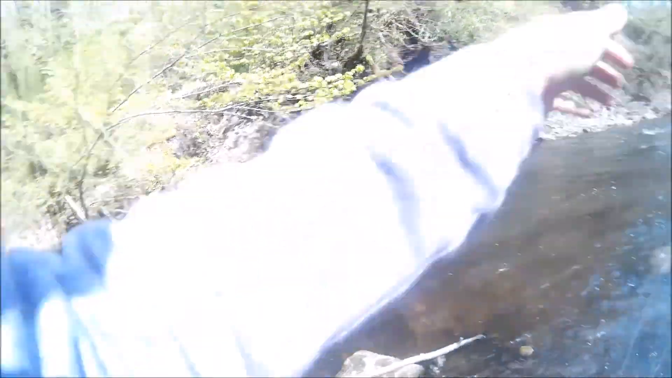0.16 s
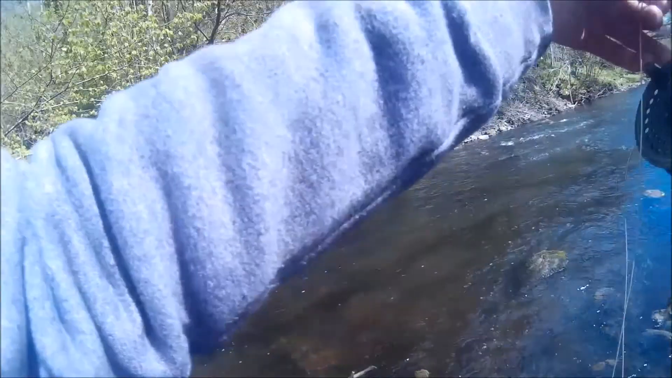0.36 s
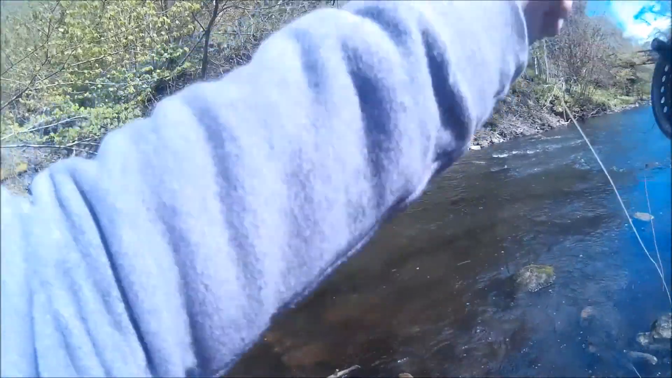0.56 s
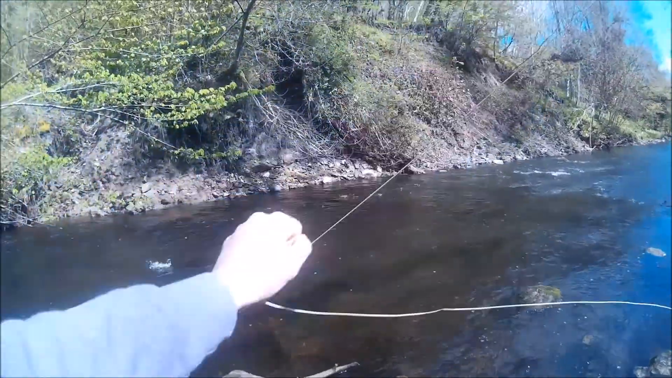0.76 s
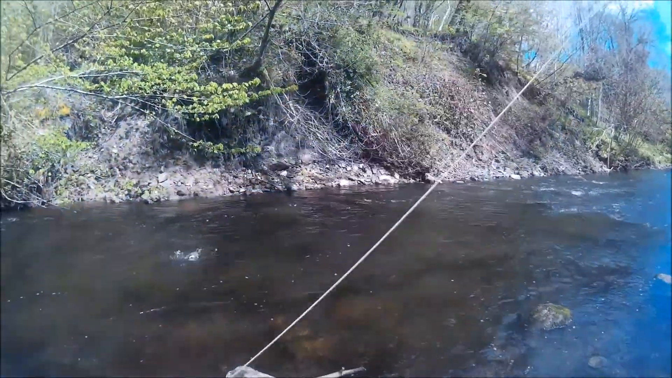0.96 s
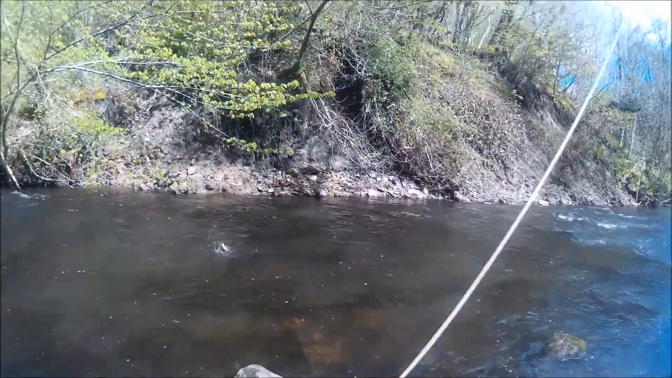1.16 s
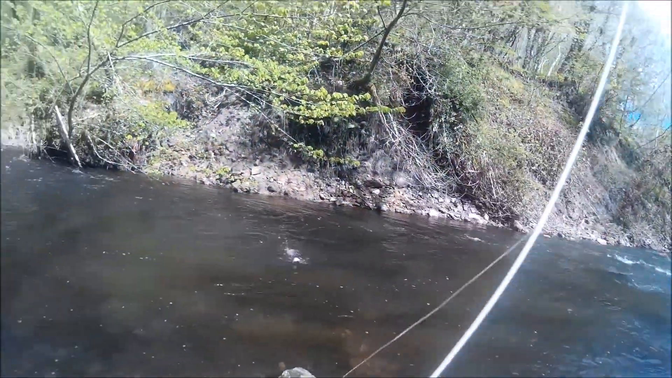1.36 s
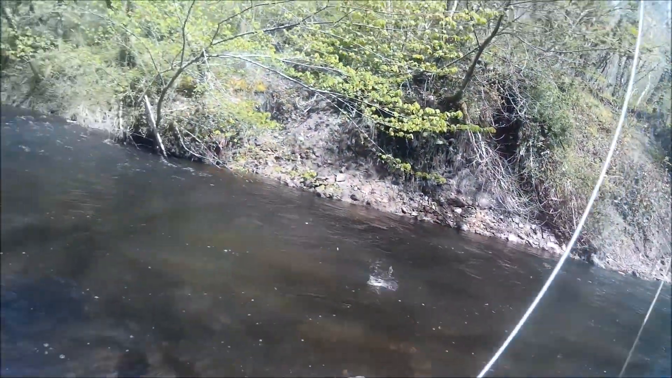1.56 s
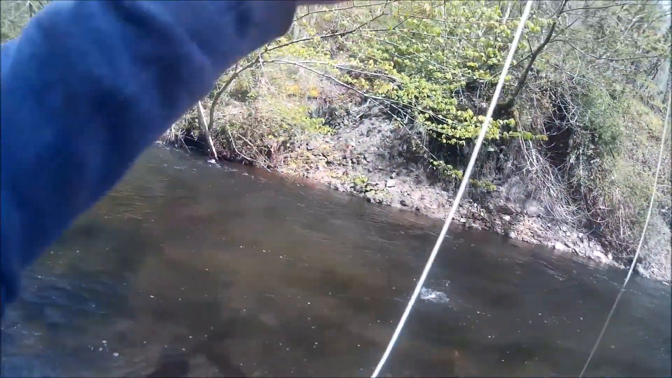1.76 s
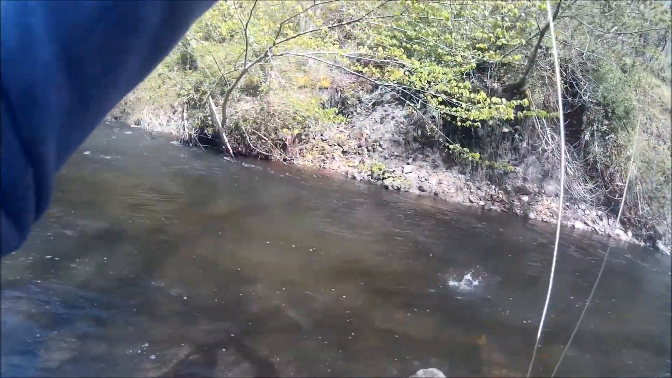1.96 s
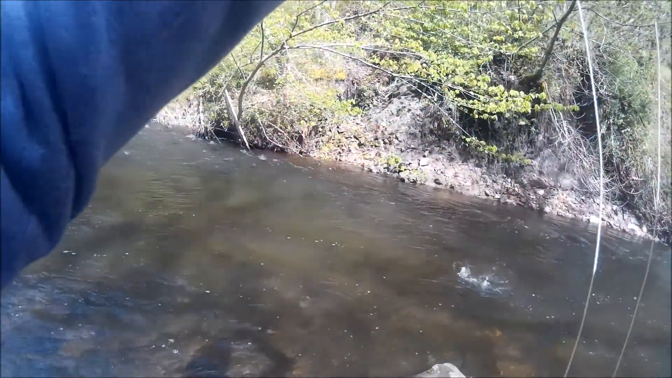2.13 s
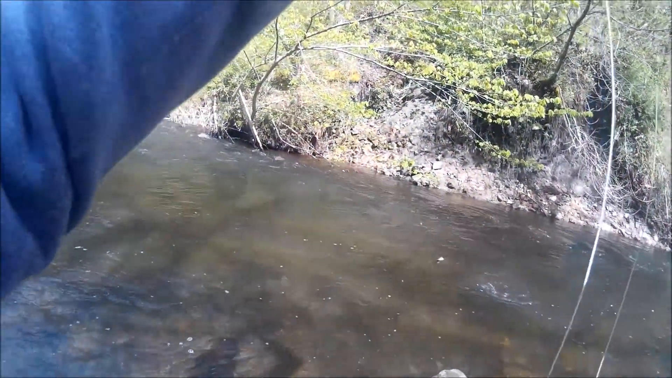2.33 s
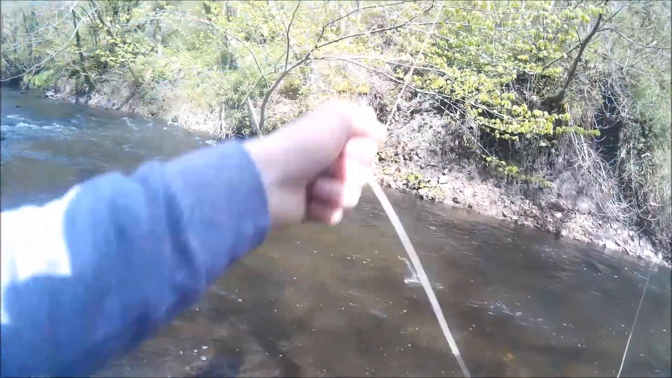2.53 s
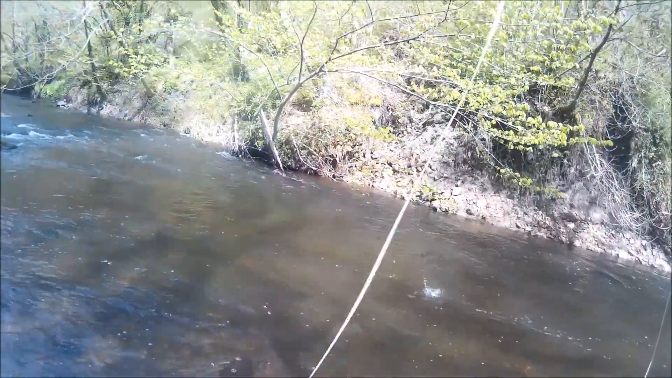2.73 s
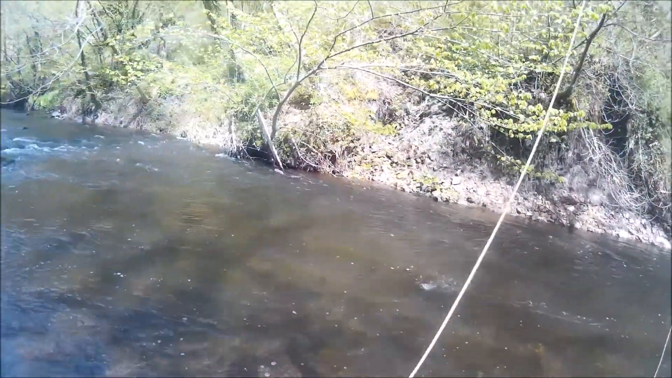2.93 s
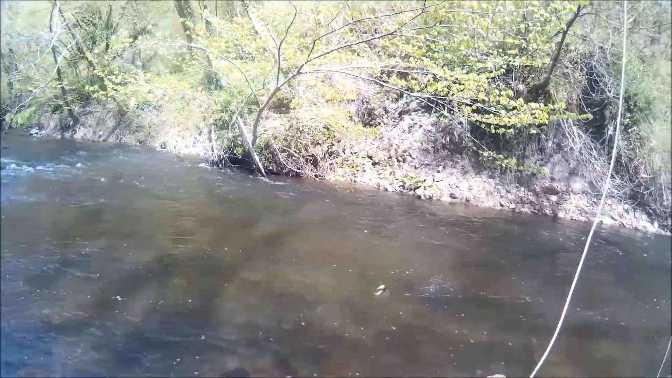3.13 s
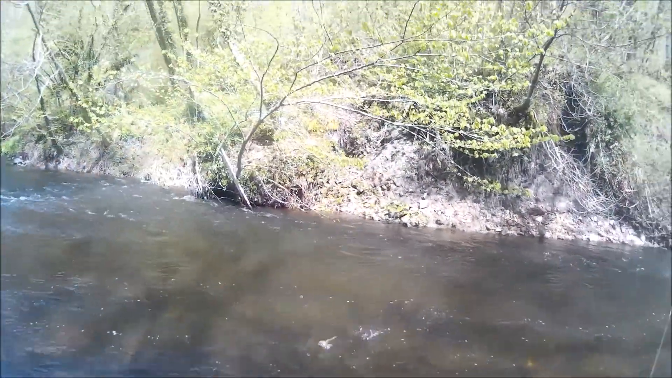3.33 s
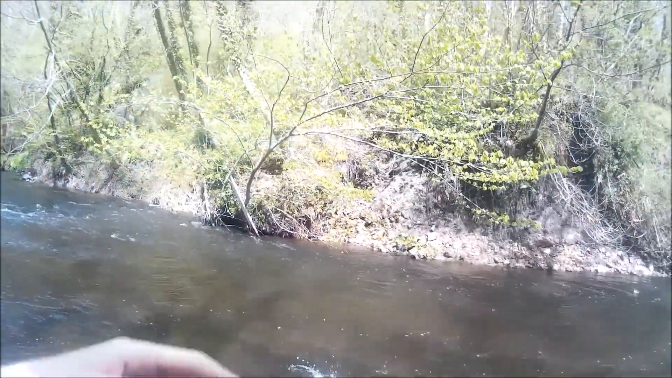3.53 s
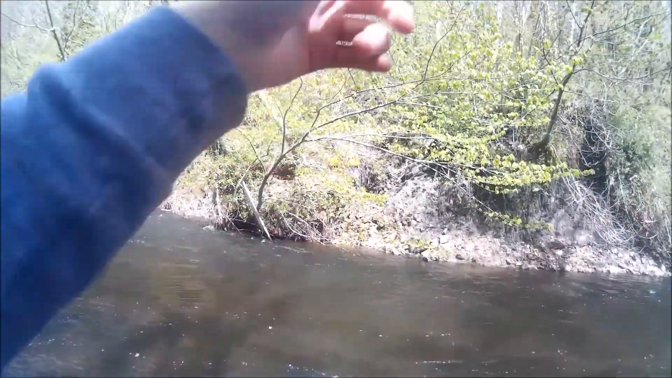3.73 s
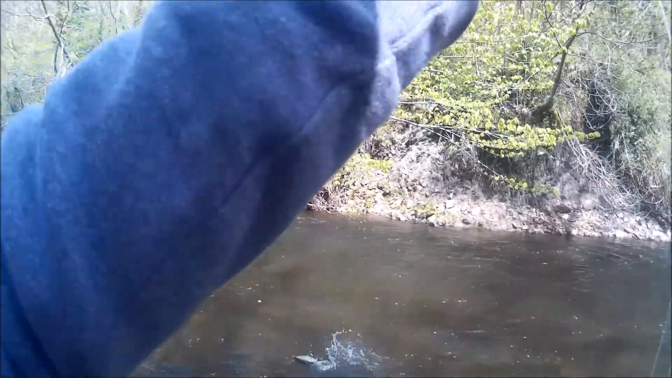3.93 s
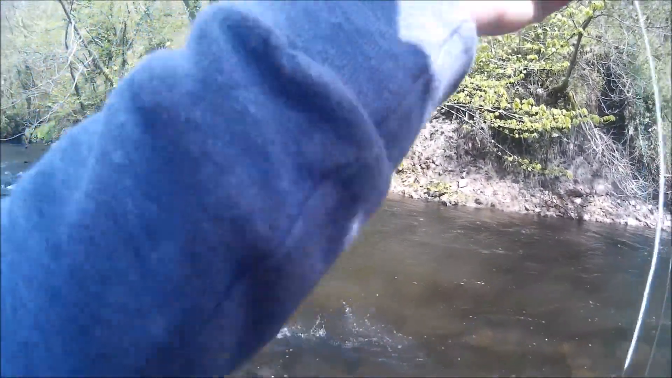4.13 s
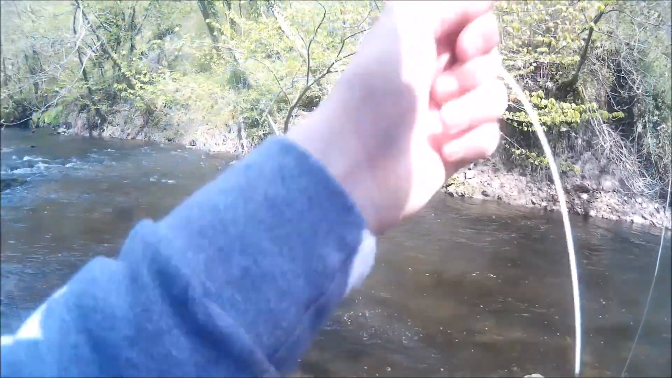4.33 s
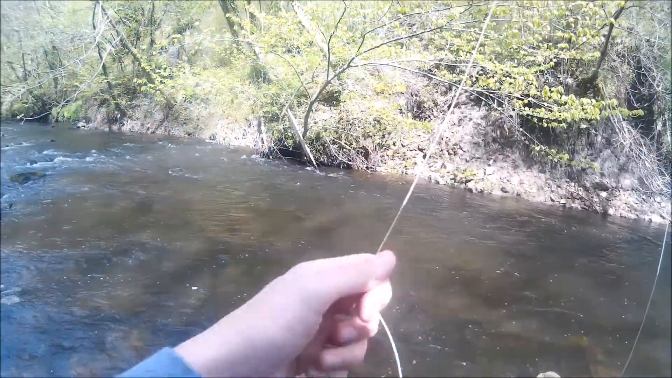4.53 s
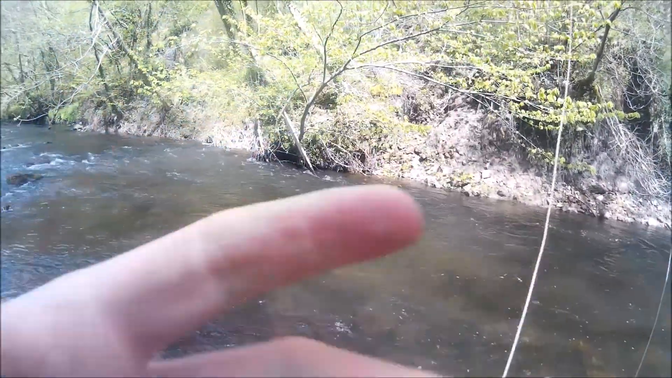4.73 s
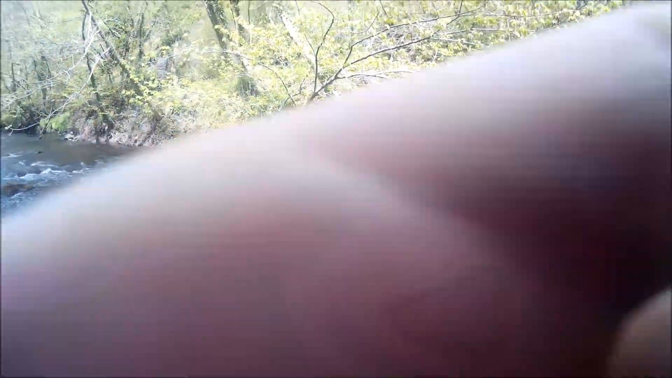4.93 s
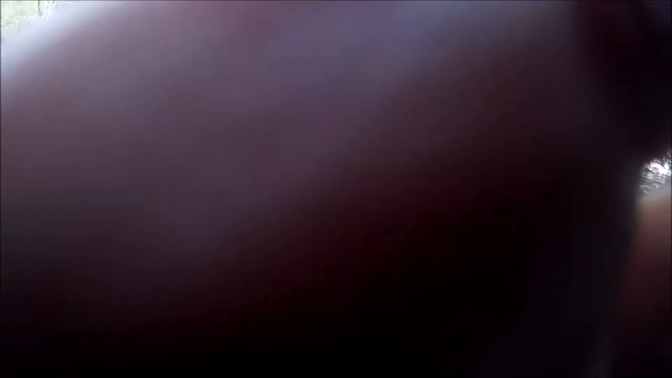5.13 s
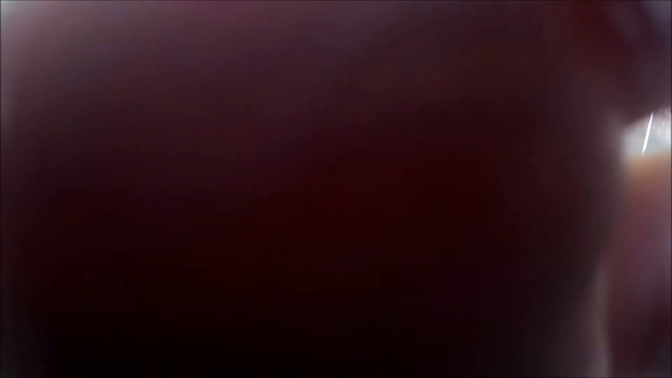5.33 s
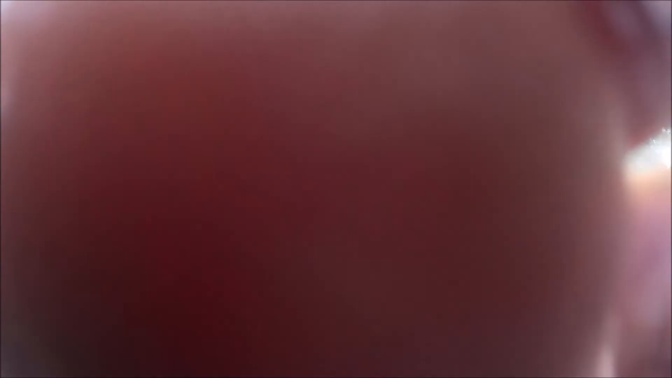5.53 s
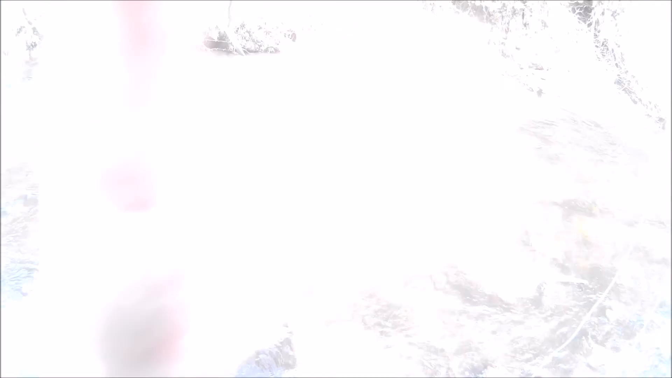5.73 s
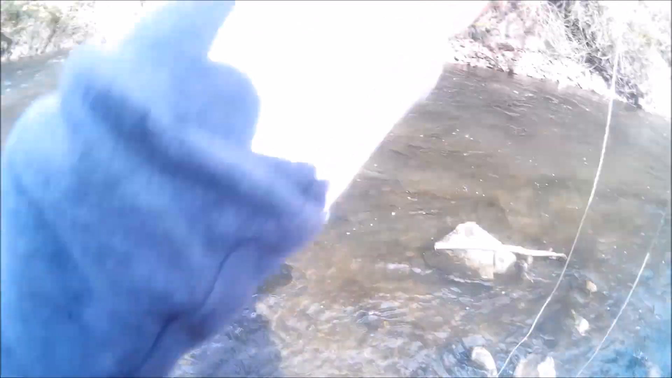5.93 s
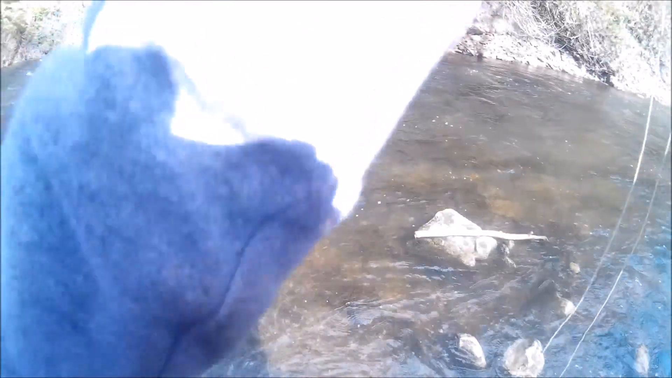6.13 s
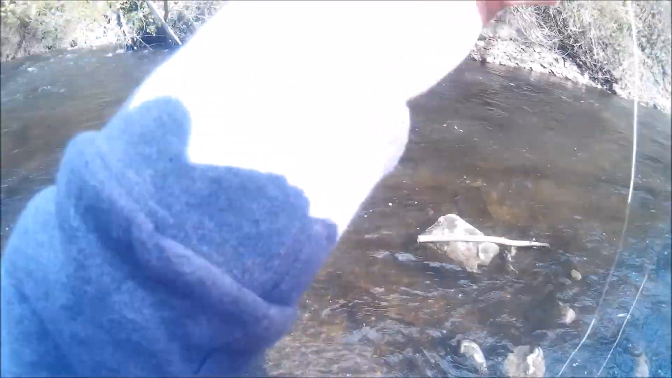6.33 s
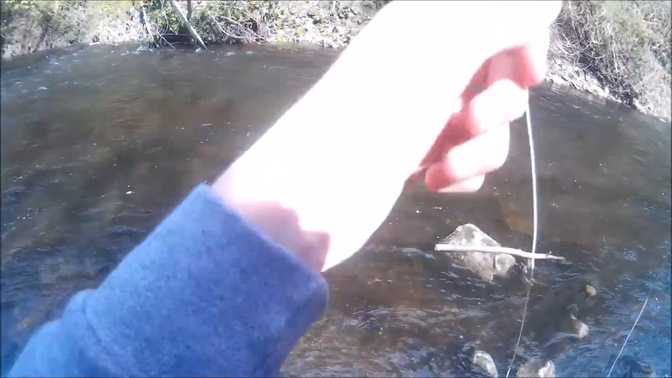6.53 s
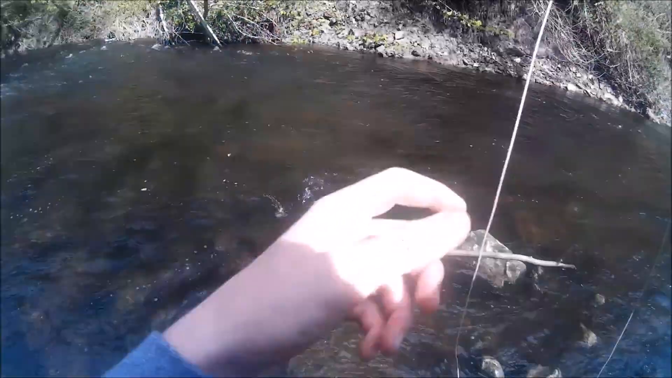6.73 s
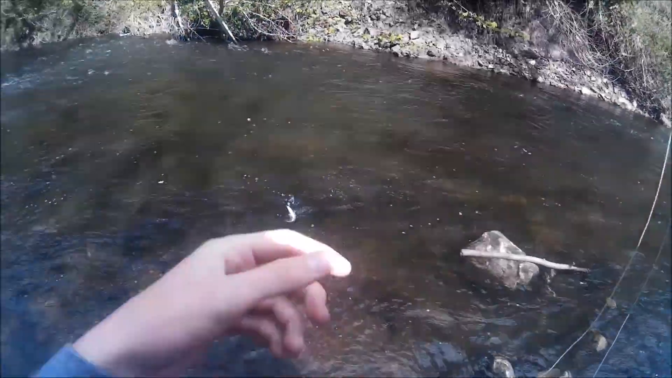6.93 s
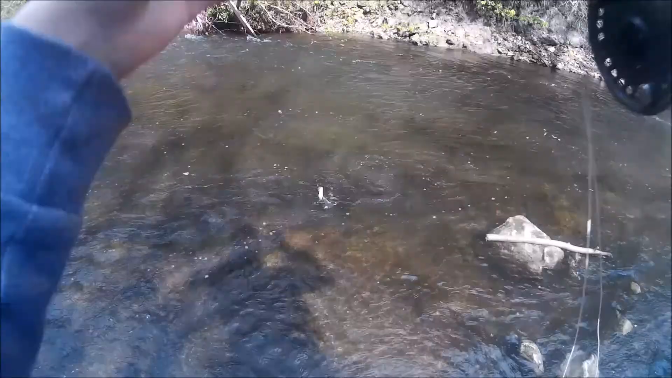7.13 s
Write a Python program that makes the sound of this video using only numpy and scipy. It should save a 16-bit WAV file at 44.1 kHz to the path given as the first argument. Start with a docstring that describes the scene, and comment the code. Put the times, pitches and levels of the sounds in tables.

```python
"""Close ticks, knocks and rubbing on the sealed plastic case of a small camera beside a stream.
The mount knocks and makes the case ring; fleece and fingers catch and slip on it and push against it.
About five seconds in, a hand grips it hard enough to overload the input. Underneath lie the
muffled stream, the hiss of the electronics and a thin high whine."""
import sys
import numpy as np
from scipy import signal
from scipy.fft import rfft, irfft, next_fast_len
from scipy.io import wavfile
from scipy.ndimage import uniform_filter1d

SR = 44100
rng = np.random.default_rng(int(sys.argv[2]) if len(sys.argv) > 2 else 0)


def wav_record(signal):
    """Record a signal, one row per channel, as 16-bit PCM in the file named by sys.argv[1]."""
    frames = np.transpose(np.atleast_2d(signal))
    bounded = np.clip(frames, -1, 1)
    # unit amplitude maps onto the largest positive 16-bit level
    quanta = np.round(bounded * 32767).astype(np.int16)
    wavfile.write(sys.argv[1], SR, quanta)


N = 320766
TOP_HZ = 16000

# The low and high tones the case rings at. Each row: pitch in Hz, relative level in dB.
LOW_TONES = [(240, -6.5), (610, -1.5), (810, -3), (1110, -6), (1380, 7), (1640, 6), (1820, 9)]
HIGH_TONES = [(2400, -10.5), (2780, -8), (3050, -7.5), (3650, -6.5), (4150, -5), (4900, -12), (5700, -13),
              (7600, -7.5), (8300, -14), (10200, -14.5), (11200, -20.5), (12500, -23.5), (14600, -24.5)]
# Blows on the case. Each row: start in seconds, snap level in dB, knock level in dB, pitch in Hz that
# the struck spot favours, treble that a soft contact takes from the snap in dB per octave.
BLOWS = [(0.1709, -31, -13.5, 2300, 35), (0.198, -19, -8.5, 1370, 51), (0.25, -23, -27, 2380, 28),
         (0.3202, -48, -23.5, 607, 13.5), (0.3376, -0.5, -18.5, 2960, 11), (0.411, 1, -24, 4460, 1.5),
         (0.4252, -13.5, -31, 4220, -2), (0.559, -46, -61, 2980, 11), (0.649, -65, -22.5, 1246, 6.5),
         (0.719, -45, -27.5, 610, 7), (0.7677, -35.5, -39, 2860, 10.5), (0.9091, -50, -15, 1200, 13),
         (0.9228, -10, -37, 2910, 1), (0.9398, -14.5, -44, 3060, -0.5), (1.5714, -50, -33.5, 1275, 0),
         (1.7654, 4, -27, 3306, 4.5), (1.77, 3.5, -16.5, 3340, -1.5), (1.796, -2, -35, 2980, -3),
         (1.8352, -42, -20.5, 1380, 5.0), (1.8396, -23, -30, 4100, -13), (1.8423, -10.5, -20, 3170, 0.5),
         (1.8658, -26.0, -36, 2970, 6), (1.8798, -31, -36, 3000, 4), (1.899, -28.5, -39, 2940, 4),
         (2.1378, -37.5, -44, 3628, 3), (2.4561, -27, -15.5, 1240, 36.5), (2.4764, -34.5, -33, 2630, 5),
         (2.534, -36, -25.5, 1335, 22), (2.765, -45, -37, 1363, 27), (2.824, -40, -33.5, 1800, 15.5),
         (2.866, -38, -32.5, 1870, 25), (3.206, -28.5, -35.5, 3330, 6), (3.2333, -33, -40, 1880, 11),
         (3.2487, -41.5, -40, 3640, 13.5), (3.262, -44, -45, 1870, 8), (3.295, -43.0, -35, 1510, 20),
         (3.3436, -34, -37, 1920, 11), (3.369, -30.5, -34.5, 2950, 7), (3.3944, -21, -30.5, 3370, -1),
         (3.412, -14.5, -25, 3790, -5.5), (3.702, -52.5, -35.5, 1380, 20),
         (3.7561, -23.5, -29.5, 2240, 6.5), (3.842, -15.5, -16.5, 1630, 18), (3.857, -52, -19, 1380, 8.0),
         (3.8833, -26, -21, 1640, 14), (3.935, -52, -25, 1420, 12.0), (4.324, -58, -31.5, 1390, 8.0),
         (4.3464, -31, -33, 1720, 26), (4.4134, -22, -35, 2490, 13), (4.582, -48, -35.5, 1300, 17),
         (4.6012, -36, -32.5, 1450, 17), (4.665, -37, -25.5, 1510, 18), (4.869, -20, -19, 1816, 8),
         (4.922, -27.5, -27, 1270, 7), (4.937, -24, -25.5, 1370, 9), (4.984, -10, -27, 2890, -0.5),
         (4.9977, -13.5, -22.5, 3040, -1), (5.025, -22, -43, 3630, 0), (5.0461, -9, -13.5, 3830, 5),
         (5.052, -12, -16, 1630, 6), (5.0678, -14, -14.5, 1330, 5.0), (5.0895, -30, -10, 1810, 13),
         (5.099, -15.5, -32, 3200, 8), (5.109, -18, 0.5, 1376, 0), (5.1168, -21, 13.5, 813, 9.0),
         (5.118, 7.5, 10, 1368, -8.5), (5.1605, -27, -12, 610, 10.5), (5.2735, -28.5, -13, 1210, 7.5),
         (5.3162, 12.5, 10, 1420, 16.5), (5.3235, -8, -1, 1570, 11), (5.3724, -34.5, -40, 3130, 6),
         (5.433, -27, -15.5, 1470, 29), (5.453, -38.5, -23.5, 582, 8), (5.9385, 2, -19.5, 2930, -1.5),
         (5.961, -31, -39.5, 2950, 10), (5.969, -32, -43, 2950, 14), (5.9843, -25.0, -32.5, 2910, 1.5),
         (6.051, -53.5, -34, 1370, 14.5), (6.09, -40.5, -49.5, 2760, 17), (6.336, -38.5, -47, 2790, 21)]

def ticks_and_knocks():
    """Each blow rings the high tones as a snap and the low tones as a knock."""
    out = np.zeros(N + SR)
    for start, snap_db, knock_db, spot_hz, dull_db in BLOWS:
        damping = 1.5 if 5.1 < start < 5.35 else 1  # the gripping hand shortens the knocks
        snap = blow(HIGH_TONES, spot_hz, dull_db, rise_s=0.0002, contact_s=0.0015)
        snap = band(snap, 1600, TOP_HZ)
        knock = blow(LOW_TONES, spot_hz, 0, rise_s=0.00036, contact_s=0.0029, damping=damping)
        i = int(start * SR)
        out[i:i + len(snap)] += undb(snap_db) * snap + undb(knock_db) * knock
    return out[:N]


def blow(tones, spot_hz, dull_db, rise_s, contact_s, damping=1):
    """One blow: tones near spot_hz ring louder, and the contact chatters for a moment."""
    hz = np.array(tones)[:, :1]
    chance = rng.standard_normal(420)
    boost_db = 11 * np.exp(-(np.log2(hz / spot_hz) / 0.11) ** 2)
    octaves_above = np.log2(np.maximum(hz / max(spot_hz, hz[0, 0]), 1))
    extra_db = 2 * chance[:len(tones), None] + boost_db - dull_db * octaves_above
    rattle = undb(-26) * np.linspace(1, 0, 400)
    chatter = chance[-400:] * (np.exp(-np.arange(400) / SR / contact_s) + rattle)
    chatter[0] = 11  # the first touch is the strongest
    sound = signal.fftconvolve(ring(tones, extra_db, rise_s, damping), chatter)
    return sound / np.abs(sound).max()


def ring(tones, extra_db, rise_s, damping):
    """The plastic rings after one tap; higher tones die sooner."""
    hz, db = np.array(tones).T[:, :, None]
    t = np.arange(SR // 16) / SR
    ring_s = 34 / (hz + 600) / damping  # time to fade by 60 dB
    sign = (-1) ** np.arange(len(hz))[:, None]  # neighbouring tones swing against each other
    envelope = np.exp(-np.log(1000) * t / ring_s) * (1 - np.exp(-(t / rise_s) ** 2))
    return np.sum(sign * undb(db + extra_db) * envelope * np.sin(2 * np.pi * hz * t), axis=0)


# Dull bumps. Each row: start in seconds, strength in dB, pitch in Hz.
JOLTS = [(0.287, -23, 234), (0.318, -27, 113), (0.721, -28, 125), (1.79, -27, 224), (1.985, -30.5, 117.6),
         (2.826, -28.5, 268), (2.863, -32.5, 224), (3.801, -29.5, 103), (4.915, -19, 95), (5.119, 5, 176.9),
         (5.162, -19, 99.5), (5.3152, -2.5, 120), (5.386, -18.5, 85)]

def bumps():
    """The whole case is jolted and swings once or twice."""
    out = np.zeros(N + SR)
    t = np.arange(SR // 8) / SR
    for (start, db, hz), side in zip(JOLTS, np.sign(rng.standard_normal(len(JOLTS)))):
        envelope = np.exp(-t * hz / 1.1) * (1 - np.exp(-t / 0.000079))
        i = int(start * SR)
        out[i:i + len(t)] += side * undb(db) * envelope * np.sin(2 * np.pi * hz * t)
    return out[:N]


# Strokes of cloth or skin. Each row: start in seconds, length in seconds, fade in dB (negative grows),
# then the levels of the low tones, the high tones and the fine rasp in dB.
RUBS = [(0.18, 0.17, 10.5, -33.5, -48.5, -64.5), (0.21, 0.041, 2, -27.5, -44.5, -63),
        (0.33, 0.14, 2, -51, -56.5, -66), (0.645, 0.23, 3, -46, -57, -70.5),
        (0.911, 0.0073, -4, -37, -50, -80), (0.93, 1, 22, -54.5, -63, -77),
        (1.795, 0.095, 6.5, -36.5, -41.5, -56.5), (1.9, 0.3, 17, -51.5, -64.5, -84),
        (2.42, 0.14, -9, -54, -65, -96), (2.57, 0.38, 9.5, -52, -60.5, -75),
        (3.42, 0.022, 9.5, -40, -41.5, -87), (3.72, 0.074, -12, -56.5, -60, -82.5),
        (3.81, 0.14, 5.5, -38.5, -45.5, -64.5), (3.89, 0.027, 1.5, -36, -39.5, -62),
        (4.3, 0.15, 3, -48.5, -55, -77), (4.57, 0.12, -16, -66.5, -77, -89.5),
        (4.845, 0.023, -8.5, -48.5, -51.5, -64), (4.91, 0.032, -2, -49.5, -46, -57.5),
        (4.98, 0.076, -3.5, -40.5, -39, -49), (5.095, 0.037, 9, -25, -27.5, -46.5),
        (5.16, 0.032, 4.5, -38, -46, -65), (5.245, 0.087, 0.5, -36.5, -44.5, -61.5),
        (5.39, 0.11, -5.5, -53.5, -62, -80), (5.53, 0.046, 2, -48.5, -58.5, -69),
        (5.6, 0.042, 4, -50, -51.5, -63), (5.95, 0.085, 3.5, -42, -52, -67),
        (6.05, 0.54, 2, -64.5, -69.5, -88)]

def rubbing(resting_gain):
    """Slipping fibres ring the case and rasp in the treble; a faint rub goes on between strokes."""
    low_gain, high_gain, rasp_gain = gestures(RUBS, rise_db_per_s=695, fall_db_per_s=697.5)
    low_tones, high_tones = np.array(LOW_TONES[1:]), np.array(HIGH_TONES[:7])
    # Soft cloth favours the low tone at 1380 Hz and the lowest of the high tones.
    octaves = np.log2(low_tones[:, 0] / 1380)
    low_db = np.minimum(3.5 * octaves, -14 * octaves)
    high_db = -9 * np.log2(high_tones[:, 0] / high_tones[0, 0])
    low = drag(fibres(6000, 4, 2.5, 71), low_tones, low_db, rise_s=0.0022, damping=0.62, wander_db=3)
    high = drag(fibres(5000, 3.4, 2.9, 120), high_tones, high_db, rise_s=0.001, damping=1.4, wander_db=2)
    rasp = unit(band(fibres(12000, 1.8, 2, 81), 5200, 11800))
    low_gain = np.hypot(low_gain, resting_gain)
    high_gain = np.hypot(high_gain, resting_gain * undb(-17))
    return low_gain * low + high_gain * high + rasp_gain * rasp


def fibres(slips_per_s, spread_db, patchy_db, patches_per_s):
    """Fibres catch and let go at random: mostly small slips, in louder and softer patches."""
    size_db = np.minimum(spread_db * rng.exponential(size=N), 12)
    slips = (rng.random(N) < slips_per_s / SR) * rng.standard_normal(N)
    return slips * undb(size_db + patchy_db * wander(patches_per_s))


def drag(slips, tones, extra_db, rise_s, damping, wander_db):
    """The contact travels over the case, so each tone swells and fades on its own."""
    out = 0
    for tone, db in zip(tones, extra_db):
        ringing = signal.fftconvolve(slips, ring([tone], db, rise_s, damping))[:N]
        out += undb(wander_db * wander(14)) * ringing
    return unit(out)


# The deep sound of the case bending. Each row: pitch in Hz, relative level in dB.
FLEX_COLOUR = [(29, -33.5), (50, -3), (187, -5), (270, -10), (350, -14.5), (500, -17), (650, -51),
               (1100, -120)]
# Pushes of a hand or arm. Each row: start in seconds, length in seconds, fade in dB,
# level of the case flexing in dB, level of the air swaying in dB.
HAND_PUSHES = [(0.18, 0.091, -6, -38.5, -54), (0.7, 0.24, 3, -48, -70.5), (1.78, 0.044, -5, -39, -57.5),
               (2.45, 0.42, 22, -49, -50), (3.78, 0.22, 7.5, -46, -57), (4.9, 0.11, -3.5, -45.5, -37.5),
               (5.09, 0.03, 1.5, -29.5, -29), (5.21, 0.03, 3, -64.5, -32.5), (5.255, 0.14, 8, -39, -25.5),
               (5.38, 0.021, -1, -54, -28), (5.54, 0.033, 0.5, -42.5, -40.5), (5.65, 0.066, 8, -60, -46.5),
               (5.88, 0.12, -1.5, -50, -59.5)]

def pushes(resting_gains):
    """Slow pushes flex the case and pump the air at the microphone."""
    push_gains = gestures(HAND_PUSHES, rise_db_per_s=254, fall_db_per_s=214.5)
    flex_gain, air_gain = np.hypot(push_gains, resting_gains)
    air = unit(band(rng.standard_normal(N), 3, 21))
    flex = coloured(fibres(400, 0.99, 0.93, 25), FLEX_COLOUR)
    return flex_gain * flex + air_gain * air


# Small movements. Each row: time in seconds, then levels of rubbing, flexing and air sway in dB.
FIDGETS = [(0, -62, -59, -53.5), (1.3, -59.5, -59.5, -56.5), (2.3, -68.5, -61.5, -58.5),
           (4.7, -59.5, -60, -59), (6.1, -64, -62, -74.5), (6.8, -77.5, -66, -70.5),
           (7.27, -66.5, -63, -59.5)]

def fidgeting():
    """The wearer never stands quite still: three gains that keep rubs and pushes faintly going."""
    times, *levels_db = np.transpose(FIDGETS)
    return [undb(np.interp(np.arange(N) / SR, times, db)) for db in levels_db]


# The stream and hiss together. Each row: pitch in Hz, relative level in dB.
STREAM_COLOUR = [(12, -36), (20, -7), (285, -21), (802, -25), (1570, -25), (2140, -29.5), (4420, -36.5),
                 (14700, -38.5), (16000, -45)]

def stream_and_hiss():
    """The stream, muffled by the case, and the hiss of the electronics make one soft noise."""
    return coloured(rng.standard_normal(N), STREAM_COLOUR) * undb(-60.5 + 0.23 * wander(9))


def whine():
    """A thin high tone wavers in pitch."""
    hz = 9540 + 25 * wander(150)
    return undb(-77.5) * np.sin(2 * np.pi * np.cumsum(hz) / SR)


def gestures(table, rise_db_per_s, fall_db_per_s):
    """One gain per level column: each move swells, lasts, then dies away; overlaps add in power."""
    t = np.arange(0, N, 32) / SR
    power = 0
    for start, length, fade_db, *level_db in table:
        before_db = rise_db_per_s * np.maximum(start - t, 0)
        during_db = fade_db * np.clip((t - start) / length, 0, 1)
        after_db = fall_db_per_s * np.maximum(t - start - length, 0)
        power += undb(np.array(level_db)[:, None] - before_db - during_db - after_db) ** 2
    return [np.interp(np.arange(N) / SR, t, np.sqrt(p)) for p in power]


def coloured(x, points):
    """Shape the bass and treble of x along (Hz, dB) points, at strength 1."""
    hz, db = np.transpose(points)
    size = next_fast_len(len(x))
    bin_hz = np.maximum(np.arange(size // 2 + 1) * SR / size, 1)
    gain = undb(np.interp(np.log(bin_hz), np.log(hz), db))
    return unit(irfft(rfft(x, size) * gain, size)[:len(x)])


def wander(turns_per_s):
    """A smooth random drift of strength 1."""
    hold = int(SR / turns_per_s)
    steps = np.repeat(rng.standard_normal(N // hold + 1), hold)
    return unit(uniform_filter1d(uniform_filter1d(steps, hold), hold)[:N])


def band(x, lo_hz, hi_hz):
    return signal.sosfilt(signal.butter(2, [lo_hz, hi_hz], "band", fs=SR, output="sos"), x)


def undb(db):
    return 10 ** (np.asarray(db) / 20)


def unit(x):
    """Scale x to an average strength (RMS) of 1."""
    return x / np.sqrt(np.mean(x ** 2))


def scene():
    """Everything meets at the one microphone inside the case."""
    rub, flex, sway = fidgeting()
    handling = ticks_and_knocks() + bumps() + rubbing(rub) + pushes([flex, sway])
    return (handling + stream_and_hiss() + whine())[None]


def record(dry):
    """The hardest blows overload the input and clip; the highest treble is cut."""
    treble_cut = signal.ellip(10, .2, 95, TOP_HZ, fs=SR, output="sos")
    return signal.sosfilt(treble_cut, np.clip(dry, -.93, .93))


dry = scene()
out = record(dry)
wav_record(out)
```